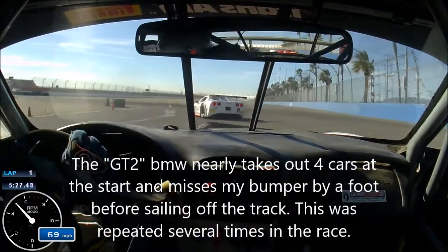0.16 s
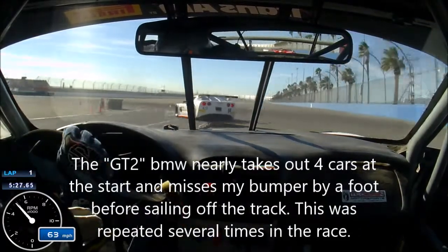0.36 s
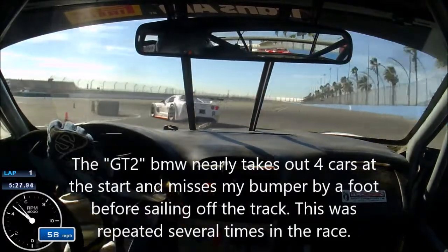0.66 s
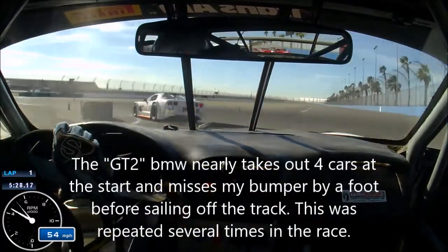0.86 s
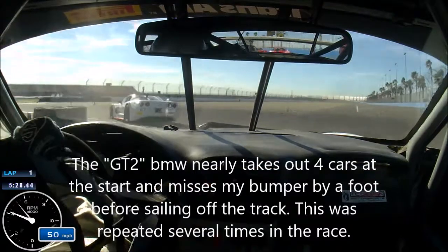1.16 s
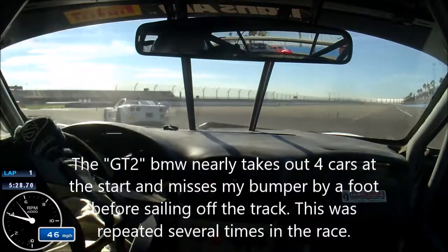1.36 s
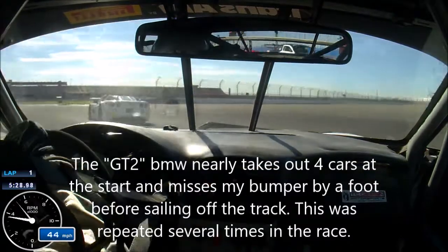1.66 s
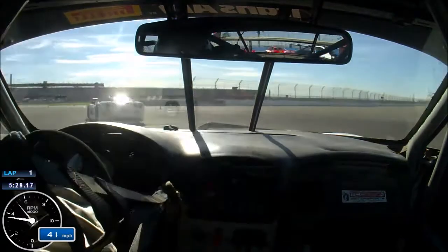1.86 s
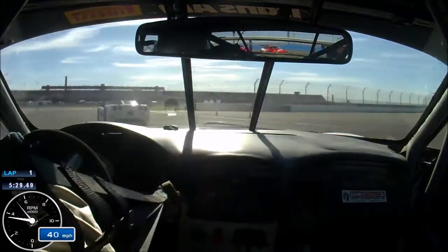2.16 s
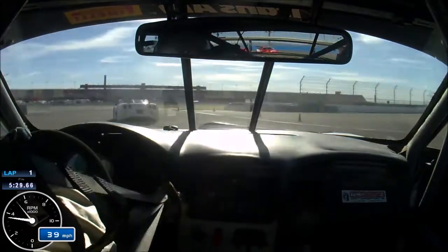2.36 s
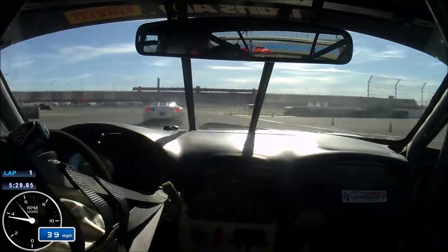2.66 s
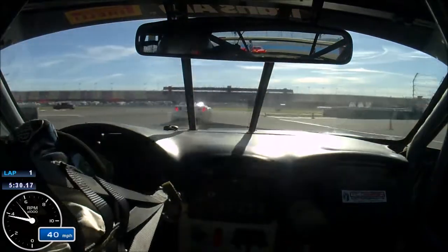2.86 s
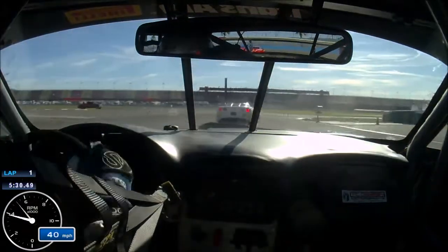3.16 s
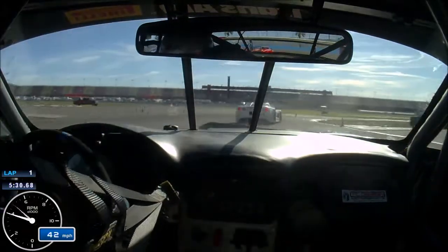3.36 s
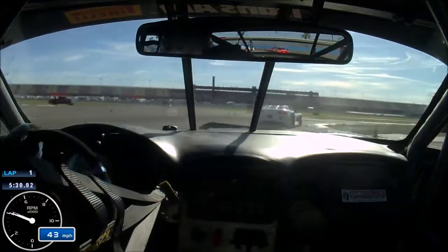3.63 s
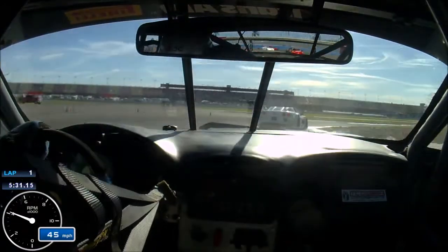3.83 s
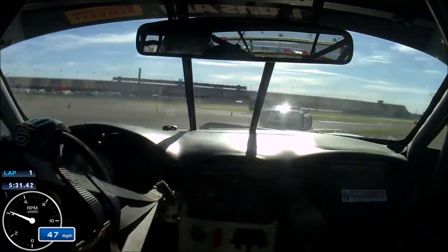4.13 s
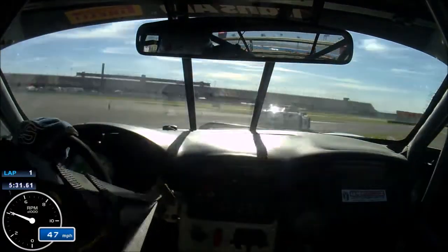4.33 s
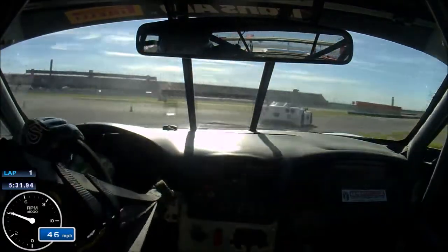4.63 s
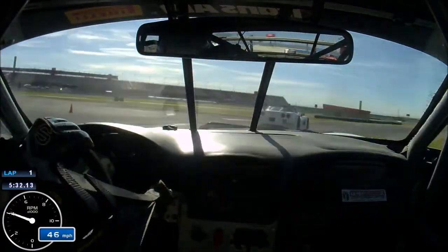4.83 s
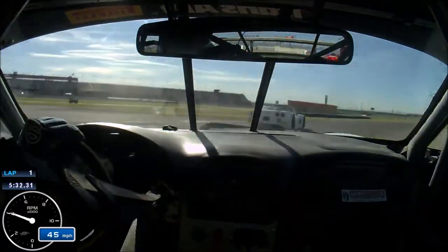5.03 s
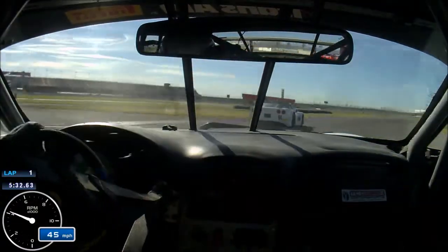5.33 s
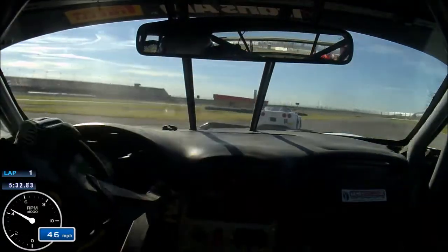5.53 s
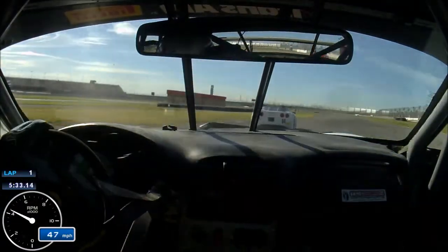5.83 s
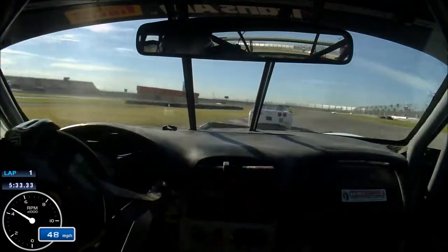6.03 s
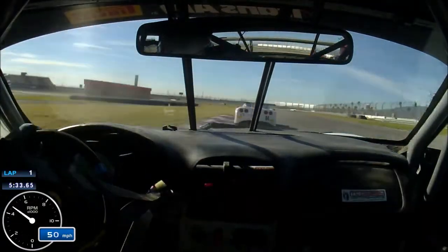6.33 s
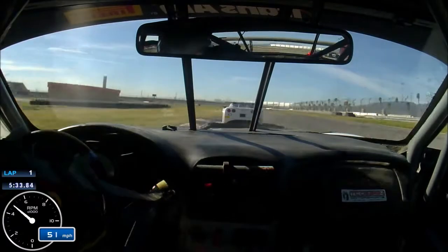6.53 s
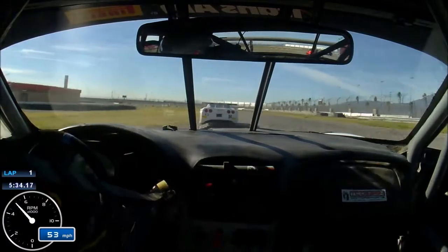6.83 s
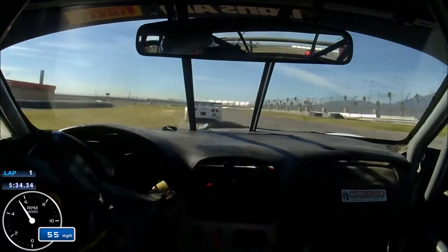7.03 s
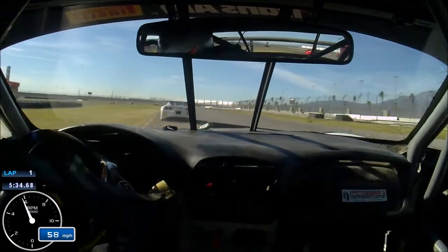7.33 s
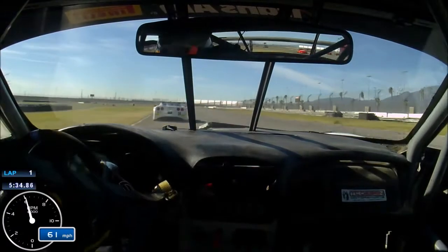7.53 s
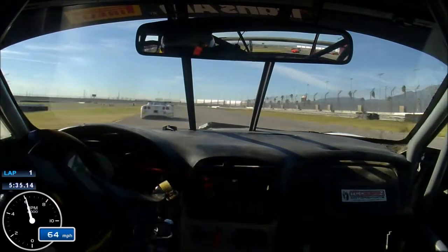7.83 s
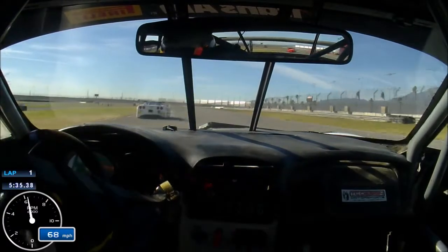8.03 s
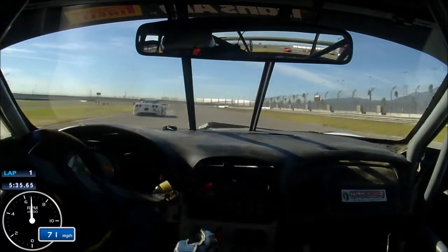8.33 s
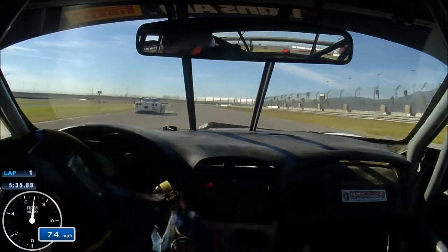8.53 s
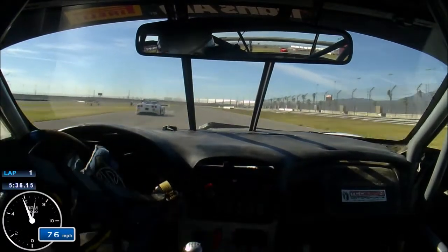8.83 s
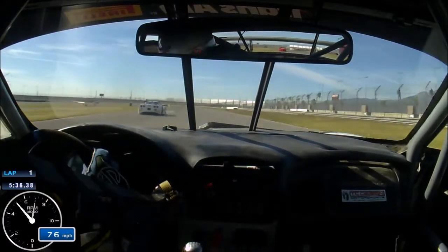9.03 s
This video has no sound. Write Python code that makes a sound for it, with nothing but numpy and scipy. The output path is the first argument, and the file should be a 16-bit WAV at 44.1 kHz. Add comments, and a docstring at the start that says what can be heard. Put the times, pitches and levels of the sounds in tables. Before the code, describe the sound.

Heard from inside a bare race car on a small camera microphone, a V8 drops in pitch under braking over a loud driveline drone. It burbles low through the corner with panel knocks, road boom and a thin high whistle, then accelerates into a full roar, shifts up with a brief dip, and pulls again.

```python
"""First a V8 slowing for a corner over a droning driveline; then it holds, pulls hard and shifts up.
We are inside a stripped race car, with a small camera for a microphone. Sines locked to the engine cycle
sweep through the cabin's fixed resonances. Coloured noise makes road boom, panel roar and wind hiss.
A thin line whistles at a gap, a low sine is the shaken body, and ringing modes and short tones
are its knocks and squeaks."""
import sys
import numpy as np
from scipy import signal
from scipy.fft import rfft, irfft, next_fast_len
from scipy.io import wavfile
from scipy.ndimage import uniform_filter1d

SR = 44100
rng = np.random.default_rng(int(sys.argv[2]) if len(sys.argv) > 2 else 0)


def voltage_ratio(decibels):
    """Convert decibels (scalar or array-like) to amplitude ratios, 20 dB per decade."""
    exponent = np.asarray(decibels, float) / 20
    return 10 ** exponent


def store_pcm(level_fs):
    """Save levels as 16-bit WAV."""
    pcm = np.round(np.clip(level_fs, -1, 1) * 32767).astype(np.int16)
    wavfile.write(sys.argv[1], SR, np.atleast_2d(pcm).T)


N = 405279

# colour of the floor pan: freq_hz, gain_db
FLOOR_COLOUR = [(140, -28.5), (230, 0), (264, -4.5), (296, 2.5), (403, -2), (432, -5), (500, -12),
                (650, -40.5), (1100, -120)]
# colour of the roaring panels: freq_hz, gain_db
PANEL_COLOUR = [(260, -41), (450, -8), (532, -7.5), (594, -4.5), (647, -2.5), (684, -3.5), (711, -2.5),
                (795, -19), (840, -9.5), (873, -16.5), (919, -5.5), (955, -1.5), (1060, -7.5),
                (1130, -34.5), (1250, -31), (1620, -49), (2750, -120)]
# colour of the rasp above them: freq_hz, gain_db
RASP_COLOUR = [(680, -33.5), (1150, 2), (1230, -2.5), (1340, 0.5), (1440, -0.5), (1580, 5), (1780, -7),
               (1910, 4.5), (1970, 4.5), (2250, -2.5), (2410, -18.5), (2500, -26), (3250, -45),
               (5500, -120)]


def unit(x):
    """Scales a sound to rms 1."""
    return x / np.sqrt(np.mean(x ** 2) + 1e-20)


def along(points, hz):
    """Gain at hz from (freq_hz, gain_db) points joined on a log frequency axis."""
    f, v = np.transpose(points)
    return voltage_ratio(np.interp(np.log(hz + 1), np.log(f + 1), v))


def curves(rows):
    """One value per sample for each column after the time."""
    s, *cols = np.transpose(rows)
    return [np.interp(np.arange(N) / SR, s, c) for c in cols]


def wobble(rate):
    """A random curve through rate knots a second."""
    knots = rng.standard_normal(int(N * rate / SR) + 4)
    return np.interp(np.arange(N) * rate / SR, np.arange(len(knots)), knots)


def coloured(x, spectrum):
    """Filters x by a gain at each frequency, with no phase shift."""
    m = next_fast_len(N + 8192)
    gain = along(spectrum, np.fft.rfftfreq(m, 1 / SR))
    return irfft(rfft(x, m) * gain, m)[:N]


def tone(turns):
    """A sine of rms 1 from its count of turns, starting at a random phase."""
    return np.sqrt(2) * np.sin(2 * np.pi * (turns + rng.random()))


def fade(rows, edge):
    """Open while a table of rows lasts, with ramps of edge seconds outside it."""
    start, end = rows[0][0], rows[-1][0]
    return np.interp(np.arange(N) / SR, [start - edge, start, end, end + edge], [0, 1, 1, 0])


def swell(s, length):
    """A soft Gaussian bump of height 1 about time s."""
    return np.exp(-((np.arange(N) / SR - s) / length) ** 2)


def follow(base_db, roar_share, hiss_share, roar_db, hiss_db):
    """A level that takes shares of the roar's and hiss's swings from their full-throttle levels."""
    full_roar_db, full_hiss_db = -29, -36
    return base_db + roar_share * (roar_db - full_roar_db) + hiss_share * (hiss_db - full_hiss_db)


def thin_tone():
    """A steady, very faint high sine."""
    hz, level_db = 7820, -81.5
    return voltage_ratio(level_db) * tone(hz * np.arange(N) / SR)


def body():
    """The body's lowest mode, shaken by the road: one low sine, unsteady in pitch and level."""
    # time_s, pitch_hz, level_db
    body_mode = [(0.0, 41.26, -43), (1.5, 41.2, -36.5), (2.0, 41.26, -30), (3.6, 40.6, -42),
                 (4.7, 39.25, -44), (5.05, 39.5, -31), (5.35, 41.24, -40.5), (6.7, 40.3, -37.5),
                 (7.0, 39.84, -25.5), (7.7, 32.54, -37), (8.1, 34.04, -36), (8.5, 36.4, -27.5),
                 (9.18, 36.1, -31.5)]
    hz, level_db = curves(body_mode)
    turns = np.cumsum(hz + 2.5 * wobble(8)) / SR
    return voltage_ratio(level_db + 3.5 * wobble(6.5)) * tone(turns)


def road_boom(boom_db):
    """Low noise from the road, coloured by the cabin."""
    # freq_hz, gain_db
    boom_colour = [(26, -50), (45, -18), (70, -15.5), (92, -4.5), (118, -10), (160, -3.5), (172, 2.5),
                   (186, -2), (212, -9), (220, -16), (231, -19.5), (260, -31.5), (340, -59), (570, -120)]
    noise = rng.standard_normal(N)
    return voltage_ratio(boom_db + 1.05 * wobble(6.3)) * unit(coloured(noise, boom_colour))


def wind(roar_db, hiss_db, treble_db, bumps, beat):
    """Wind noise in two bands, the lower pulsing with the engine cycle; treble_db briefly lifts or dips both."""
    # freq_hz, gain_db
    hiss_colour = [(1410, -42.5), (2400, -16.5), (2670, -7), (2900, -14.5), (3260, -3.5), (3640, -5.5),
                   (3960, 2.5), (4530, -0.5), (4980, 0.5), (5600, -2.5), (5900, -17.5), (7670, -38.5),
                   (13000, -120)]
    # freq_hz, gain_db
    top_colour = [(3380, -28.5), (5750, 1), (6930, -8), (7510, -9.5), (7990, -47), (10400, -57.5),
                  (17600, -120)]
    top_db = follow(-46.5, 0.26, 0.95, roar_db, hiss_db)
    hiss_noise, top_noise = rng.standard_normal((2, N))
    hiss_level = voltage_ratio(hiss_db + 0.34 * treble_db + 0.5 * bumps + 1.1 * wobble(22))
    hiss = hiss_level * unit(coloured(hiss_noise * (1 + 0.4 * beat), hiss_colour))
    top_level = voltage_ratio(top_db + treble_db + 1.3 * wobble(16))
    return hiss + top_level * unit(coloured(top_noise, top_colour))


def panels(roar_db, hiss_db, bumps, beat):
    """Noise shaped by floor pan and panels; the roar and rasp pulse with the engine cycle."""
    pan_db = follow(-32, 0.47, 0.2, roar_db, hiss_db)
    rasp_db = follow(-37.5, 0.44, 0.4, roar_db, hiss_db)
    # the floor pan drums under hard braking, fading as the car slows
    braking_db, braking_s = 5.5, 0.88
    pan_db = pan_db + braking_db * swell(0, braking_s)
    pan_noise, roar_noise, rasp_noise = rng.standard_normal((3, N))
    pan = voltage_ratio(pan_db + 1.8 * wobble(5.4)) * unit(coloured(pan_noise, FLOOR_COLOUR))
    roar = voltage_ratio(roar_db + 1.6 * bumps) * unit(coloured(roar_noise * (1 + beat), PANEL_COLOUR))
    rasp_level = voltage_ratio(rasp_db + 1.1 * bumps + 1.8 * wobble(13))
    rasp = rasp_level * unit(coloured(rasp_noise * (1 + 0.34 * beat), RASP_COLOUR))
    return pan + roar + rasp


def cabin(turns, load):
    """Road, panels and wind, with brief swells and dips and an engine beat; the load acts on the panels."""
    # base levels: time_s, boom_db, roar_db, hiss_db
    road = [(0.0, -21, -41, -41), (0.3, -22.5, -39.5, -43.5), (0.5, -15, -42.5, -46.5),
            (0.75, -20, -44, -48), (1.0, -17, -44.5, -48), (1.5, -22, -42.5, -48.5), (2.0, -17, -41.5, -48),
            (3.0, -24.5, -40.5, -47.5), (3.4, -23, -42.5, -46), (4.0, -20, -41, -48),
            (4.3, -16, -45, -48.5), (4.65, -15.5, -44, -47.5), (4.8, -21, -41.5, -48),
            (5.0, -18, -37.5, -44.5), (5.25, -21, -39.5, -46), (5.5, -14.5, -38.5, -46.5),
            (5.75, -24.5, -37.5, -45), (6.2, -24, -36, -42.5), (6.4, -10, -34, -42), (6.7, -12, -27, -37),
            (7.2, -18.5, -31, -37), (7.6, -23.5, -28.5, -35), (8.3, -20.5, -30, -34.5),
            (8.45, -19.5, -32.5, -38), (8.6, -20, -31, -42), (8.75, -22, -29.5, -38.5),
            (9.18, -24.5, -28.5, -36.5)]
    # brief swells and dips of the cabin noise, from bumps, braking and the gear change:
    # time_s, length_s, roar_change_db, treble_change_db
    surges = [(0.082, .05, 8, -2.5), (0.27, 0.094, 3.5, -0.5), (0.794, .3, 4, 5.5), (4.842, 0.036, 8, 4),
              (4.917, 0.033, -1, 9.5), (5.013, 0.057, 2, 0.5), (6.003, 0.15, 2, -1.5), (6.596, 0.043, 5, 2),
              (6.992, 0.086, 3.5, 3.5), (8.337, 0.049, 3, -0.5), (8.545, 0.014, 3, -3),
              (8.691, 0.042, 3, 4), (8.797, .06, 6, -0.5)]
    boom_db, roar_db, hiss_db = curves(road)
    change_db, treble_db = sum(np.outer([low, high], swell(s, length)) for s, length, low, high in surges)
    roar_db = roar_db + change_db
    bumps = wobble(13)  # the road shakes the panels together
    # once a cycle, once a crank turn, and at the firing rate
    beat = 0.13 * tone(turns) + 0.048 * tone(2 * turns) + 0.13 * tone(8 * turns)
    return (road_boom(boom_db) + load * panels(roar_db, hiss_db, bumps, beat)
            + wind(roar_db, hiss_db, treble_db, bumps, beat))


def squeaks():
    """Trim squeaks, each a brief, soft-edged tone."""
    # start_s, pitch_hz, peak_db
    trim = [(1.487, 5250, -45), (1.576, 3300, -42)]
    t = np.arange(N) / SR
    out = np.zeros(N)
    for s, hz, peak_db in trim:
        envelope = swell(s + .004, .003)
        out += voltage_ratio(peak_db) * envelope * np.sin(2 * np.pi * hz * t)
    return out


def knocks():
    """Each bump rings the same panel, duller or brighter by where it is struck, with a short crack."""
    # start_s, level_db, dull_modes_db, bright_modes_db, ring_length_factor
    strikes = [(1.034, -29, -3, 2, 1.2), (1.543, -37, 9, -6, 1.3), (2.524, -23, -3, -2, .7),
               (2.535, -24, -1, -9, 1.6), (4.31, -29, -7, -10, 1.1), (4.449, -19, -10, -8, .9),
               (4.685, -23, -5, -7, 1.4), (4.698, -30, 10, -3, 1.5), (4.826, -23, -10, -12, 2.2),
               (4.86, -25, -8, -14, 2.1), (4.998, -24, -1, -4, 1.8), (5.641, -27, -5, -10, 1.3),
               (6.298, -25, 1, -24, 1.3), (7.349, -17, -3, -14, 1.3)]
    # freq_hz, level_db, t60_s (before the ring length factor), group (0 dull, 1 main, 2 bright)
    panel_modes = [(560, -4, .05, 0), (690, -5, .05, 0), (950, -7, .06, 1), (1030, -2, .045, 1),
                   (1530, -6, .035, 2), (1990, -2, .04, 2)]
    out, t = np.zeros(N + 8192), np.arange(8192) / SR
    onset = 1 - np.exp(-t / .0015)
    for s, level_db, dull_db, bright_db, length in strikes:
        ring = np.zeros(8192)
        for hz, mode_db, t60, group in panel_modes:
            group_db = [dull_db, 0, bright_db][int(group)]
            decay = voltage_ratio(mode_db + group_db - 60 * t / (t60 * length))
            ring += decay * np.sin(2 * np.pi * hz * t)
        grit = uniform_filter1d(rng.standard_normal(8192), size=5)
        grit = uniform_filter1d(grit, size=5)
        crack = voltage_ratio(bright_db - 2 - 60 * t / .018) * grit
        out[round(s * SR):][:8192] += voltage_ratio(level_db) * onset * (ring + crack)
    return out[:N]


def whistle():
    """Air at a gap: a thin wandering line that fades near the sampling limit, with a mirror image."""
    # time_s, pitch_hz
    pitch = [(0.62, 7343), (0.78, 7775), (0.89, 8043), (0.95, 7747), (1.075, 7515), (1.092, 6900),
             (1.11, 7250), (1.17, 7488), (1.27, 7327), (1.62, 7115), (1.7, 7251), (2.05, 7250),
             (2.45, 7365), (2.54, 7540), (2.74, 7709), (3.05, 7970), (3.38, 7714), (3.46, 7790),
             (3.55, 7680), (3.9, 7714), (4.15, 7946), (4.23, 7865), (4.55, 7990), (4.66, 8150),
             (4.74, 8000), (4.84, 7700), (4.9, 8100), (5.0, 7343), (5.1, 7330), (5.16, 7564), (5.25, 7260),
             (5.35, 7400), (5.42, 7260), (5.5, 7390), (5.6, 7300)]
    # time_s, level_db
    blown = [(.62, -20), (.95, -0.5), (1.1, 0), (1.26, 1), (2.45, -0.5), (2.54, -6.5), (4.3, -5.5),
             (4.9, -13.5), (5.0, -26), (5.6, -22)]
    # fading near the band edge: freq_hz, level_db
    band_edge = [(7000, -51), (7350, -50), (7550, -56), (7750, -65), (7950, -77), (8200, -85)]
    fold_hz = 8000  # the image folds about this limit
    hz = curves(pitch)[0] + 9 * wobble(30) + 22 * wobble(12)
    line = sum(along(band_edge, f) * tone(np.cumsum(f) / SR) for f in (hz, 2 * fold_hz - hz))
    level = voltage_ratio(curves(blown)[0] + 1.5 * wobble(45))
    return fade(pitch, 0.12) * level * line


def drone(turns):
    """The driveline under braking: one shaft order, its pitch tied to the engine cycle."""
    # time_s, level_db
    drone_level = [(0, -15.5), (.15, -18), (.21, -27.5), (.3, -9), (.39, -6.5), (.44, -19), (.5, -9.5),
                   (.63, -22.5), (.72, -20), (.98, -22), (1.4, -27.5)]
    shaft_order = 3.67
    level = voltage_ratio(curves(drone_level)[0] + 1.6 * wobble(17))
    return fade(drone_level, 0.11) * level * tone(shaft_order * turns)


def orders(rows, hz, turns, unsteady_db, rate, colour=None):
    """Sines at multiples of the cycle, wavering in level, swelling as they cross a colour's peaks."""
    out = np.zeros(N)
    for order, level_db in rows:
        passed = 1 if colour is None else along(colour, order * hz)
        out += voltage_ratio(level_db + unsteady_db * wobble(rate)) * passed * tone(order * turns)
    return out


def engine():
    """A V8 as unsteady orders of its four-stroke cycle, coloured by the cabin; also gives the cycle count."""
    # time_s, cycle_rate_hz, torque_db (shaking the mounts), throttle_db (heard in the upper orders)
    drive = [(0.0, 43.15, -10.5, -24), (0.25, 40.13, -4.5, -18), (0.49, 37.34, -24.5, -25),
             (0.79, 34.46, -12.5, -15), (1.2, 30.97, -18.5, -26), (1.6, 30.27, -32, -29.5),
             (2.0, 30.32, -10.5, -18), (2.43, 30.87, -11, -17), (2.8, 32.26, -6, -13),
             (3.1, 33.58, -7, -13), (3.36, 34.21, -7, -15), (3.52, 34.66, -19, -13.5),
             (4.1, 34.08, -16.5, -20.5), (4.4, 33.5, -10, -17), (4.75, 33.79, -19.5, -18.5),
             (5.07, 35.89, -9.5, -11.5), (5.55, 36.44, -19, -12), (5.73, 37.48, -8.5, -11.5),
             (5.96, 38.48, -13, -9.5), (6.2, 40.31, -4.5, -8.5), (6.35, 40.88, -21, -7),
             (6.48, 42.57, -5, -4), (6.6, 44, 0.5, -10.5), (6.83, 46.48, 6.5, -6), (7.01, 48.02, 2, -4),
             (7.19, 51.3, -1.5, -4.5), (7.32, 51.17, -3.5, -1), (7.52, 50.85, -13, 1),
             (7.63, 52.13, -3.5, -1), (7.96, 54.72, -6, 2), (8.28, 57.24, 0.5, 1), (8.38, 56.07, -16, -12),
             (8.5, 51.15, -9, -15), (8.68, 42.74, -21, -5.5), (8.86, 43.47, -25, -4.5),
             (9.0, 43.93, -6.5, -1.5), (9.19, 44.54, -12.5, -3)]
    # low orders, carried by the mounts: order_of_cycle, level_db (before torque and shell)
    low_orders = [(3, -15), (4, -13.5), (5, -12.5)]
    # how the cabin passes the low orders: freq_hz, gain_db
    shell = [(88, -20), (100, -21.5), (115, -12.5), (130, -12.5), (145, -8), (158, -2.5), (170, 3.5),
             (180, -6.5), (195, -6.5), (225, -23.5), (265, -21), (290, -16)]
    # firing rate and its multiples: order_of_cycle, level_db (before throttle and bulkhead)
    firing_orders = [(8, -25.5), (16, -23.5), (24, -23)]
    # how the cabin passes the firing orders: freq_hz, gain_db
    bulkhead = [(240, -26.5), (270, -3.5), (300, 3), (350, -2.5), (400, -2.5), (440, -12.5), (480, -18),
                (505, -2.5), (530, -12), (590, -5.5), (660, -3.5), (690, 3), (708, -10.5), (727, -5),
                (750, -15), (790, -27), (835, -12.5), (880, -18), (922, 2.5), (970, -13), (1060, -22),
                (1200, -32), (1400, -22)]
    # uneven firing and two banks: order_of_cycle, relative_level_db
    middle_orders = [(6, -2), (7, -5), (9, -10), (10, -7.5), (11, -10)]
    # the same, higher up: order_of_cycle, relative_level_db
    upper_orders = [(12, 2), (13, 1), (14, -7), (15, -3), (17, -0.5), (18, 3.5), (19, -3), (20, -4),
                    (21, 0), (22, 4), (23, 0), (26, 1), (28, -5.5), (30, 3.5), (31, -9.5), (32, 5.5),
                    (34, -9), (36, 3.5), (37, 0), (38, -4)]
    # once-per-turn crank shake, booming as the tyres fight for grip: time_s, level_db
    crank_shake = [(0, -31.5), (.3, -32.5), (.8, -26), (1.6, -35), (3.1, -37.5), (4.1, -50.5), (5.2, -32),
                   (6.2, -28), (6.45, -32), (6.51, -17.5), (6.8, -12.5), (7.2, -7.5), (7.32, -23),
                   (8.1, -30.5), (8.7, -36.5), (9.0, -24), (9.19, -29.5)]
    hz, torque_db, throttle_db = curves(drive)
    turns = np.cumsum(hz) / SR + .0025 * wobble(25)  # the crank runs slightly unevenly

    crank = voltage_ratio(curves(crank_shake)[0] + 1.2 * wobble(23)) * tone(2 * turns)
    low = voltage_ratio(torque_db) * orders(low_orders, hz, turns, 1.5, 12, shell)
    firing = voltage_ratio(throttle_db) * orders(firing_orders, hz, turns, 2.2, 10, bulkhead)

    # the middle orders take a share of the torque and burble while the throttle is shut
    middle_db, torque_share, overrun_db, overrun_ends_s = -34, 0.42, 3.5, 2.03
    overrun = 1 / (1 + np.exp((np.arange(N) / SR - overrun_ends_s) / 0.12))
    middle_level = voltage_ratio(middle_db + torque_share * torque_db + overrun_db * overrun)
    middle = middle_level * orders(middle_orders, hz, turns, 3, 5, FLOOR_COLOUR)

    # the upper orders open faster than the throttle
    upper_db, throttle_share = -30, 1.3
    upper = orders(upper_orders, hz, turns, 3, 5)
    heard = (coloured(upper, PANEL_COLOUR) + voltage_ratio(-24) * coloured(upper, RASP_COLOUR)
             + voltage_ratio(-3.5) * coloured(upper, FLOOR_COLOUR))
    upper = voltage_ratio(upper_db + throttle_share * throttle_db) * heard
    return crank + low + firing + middle + upper, turns


def gear_load():
    """The drive unloads for an instant as the next gear engages: a brief dip in gain."""
    time_s, length_s, dip_db = 8.605, .018, -7
    return voltage_ratio(dip_db * swell(time_s, length_s))


def scene():
    """Sums the car's sounds at the microphone, on one channel."""
    load = gear_load()
    motor, turns = engine()
    background = thin_tone() + body() + cabin(turns, load)
    details = squeaks() + knocks() + whistle() + drone(turns)
    return (background + details + load * motor)[None]


def band_limit(x):
    """A steep low-pass at the top of the band."""
    return signal.sosfilt(signal.butter(12, 8140, fs=SR, output="sos"), x)


def record(dry):
    """The small camera: the loudest peaks round off at full scale."""
    mix = dry / (1 + np.abs(dry) ** 8) ** (1 / 8)
    return band_limit(mix)


dry = scene()
out = record(dry)
store_pcm(out)
```